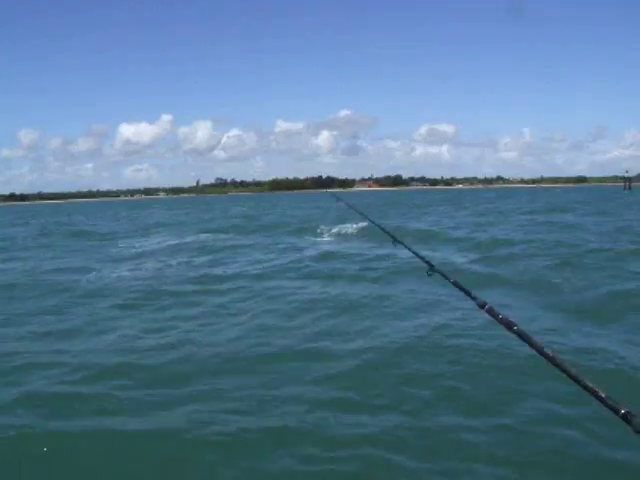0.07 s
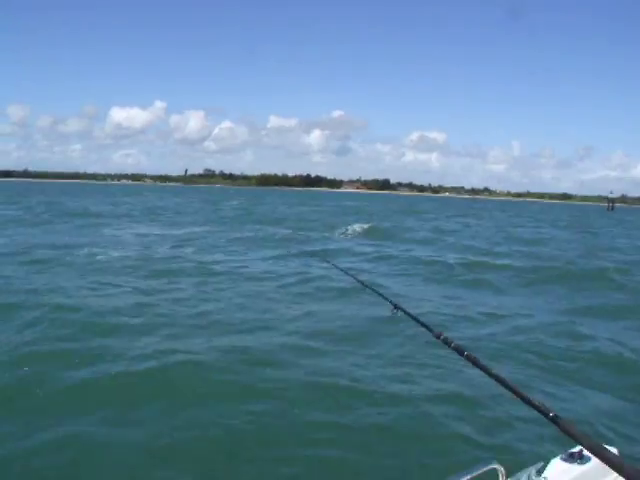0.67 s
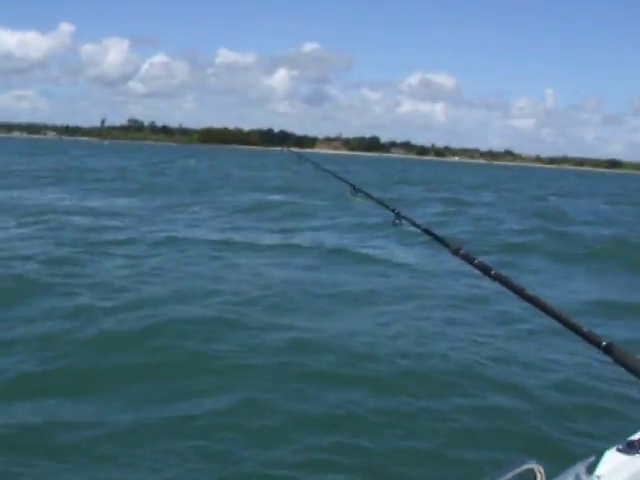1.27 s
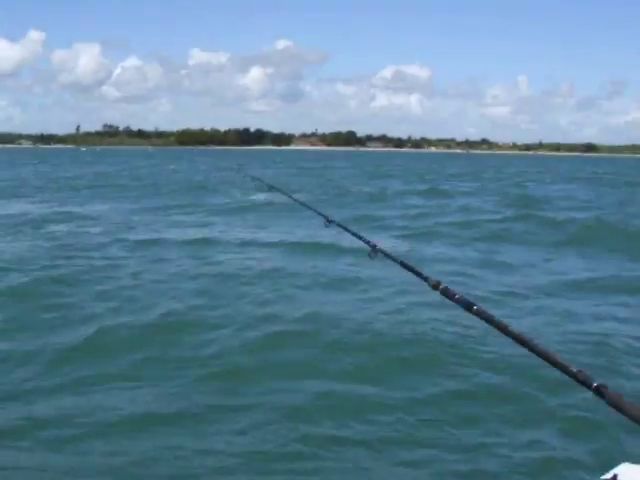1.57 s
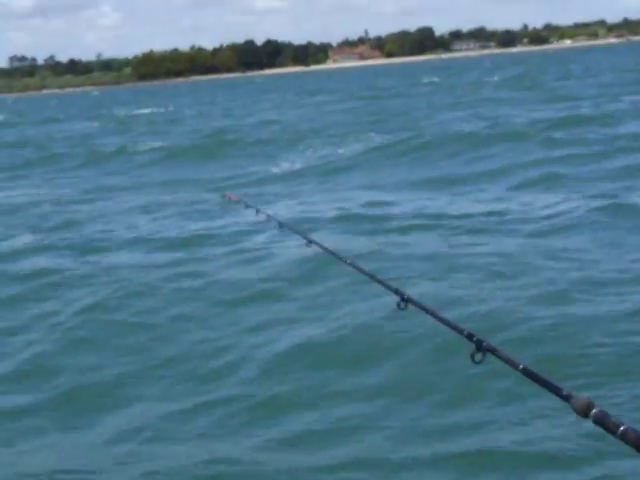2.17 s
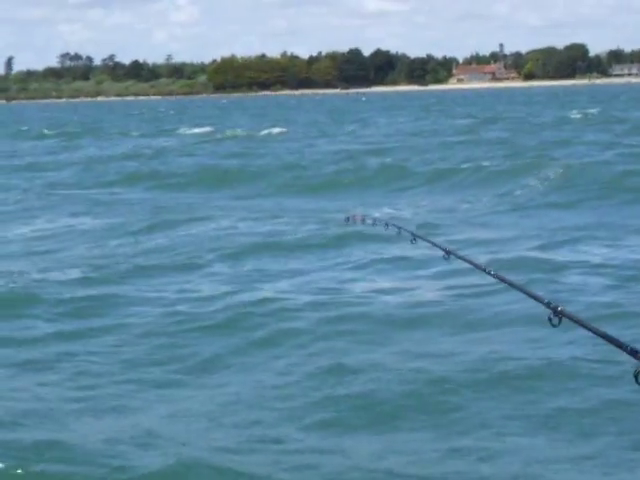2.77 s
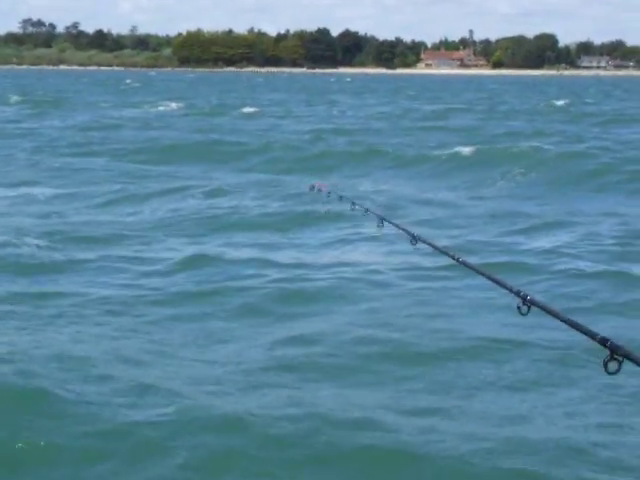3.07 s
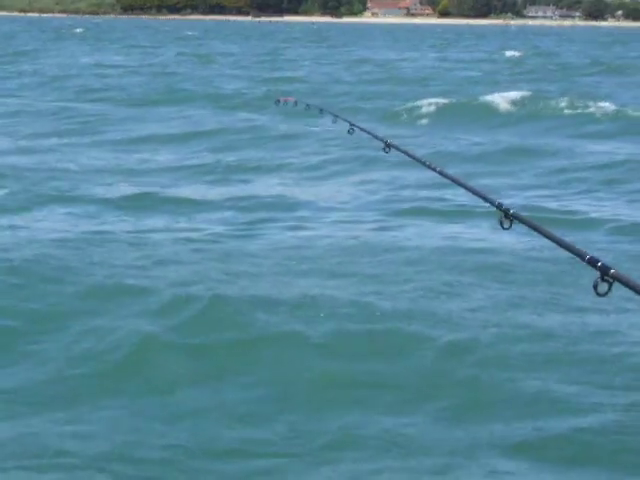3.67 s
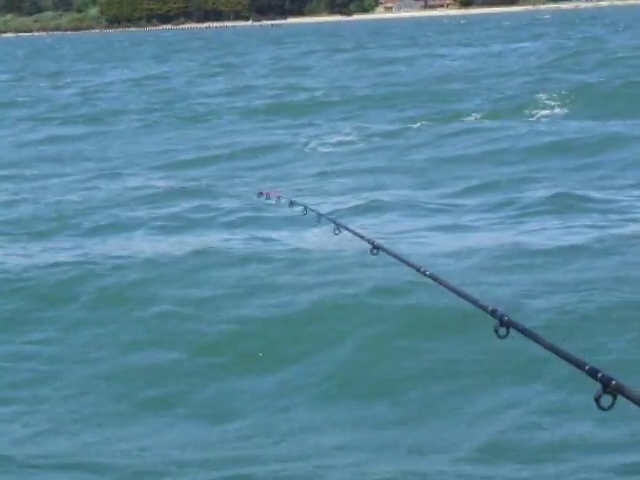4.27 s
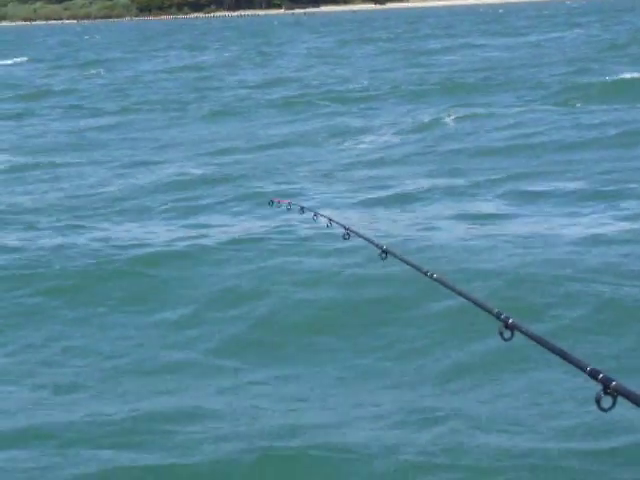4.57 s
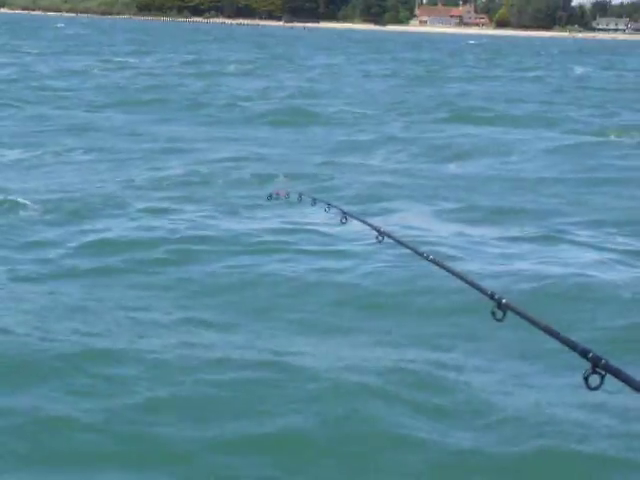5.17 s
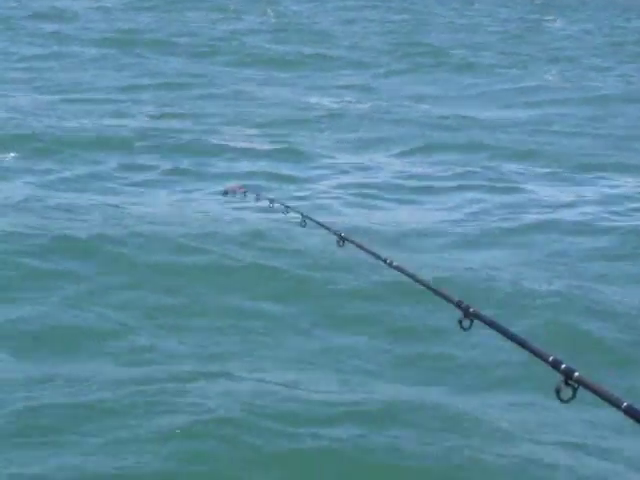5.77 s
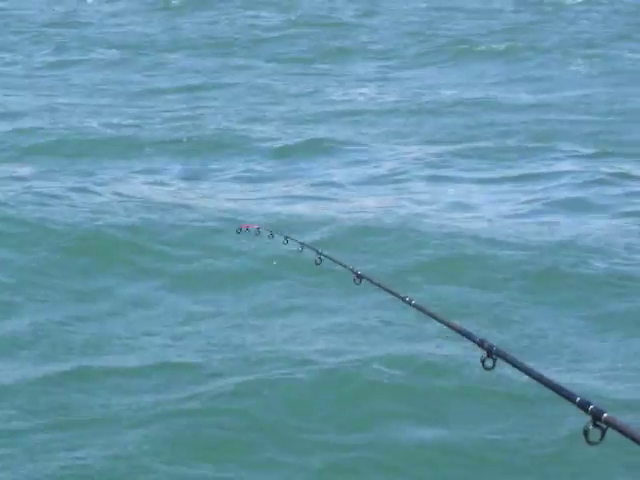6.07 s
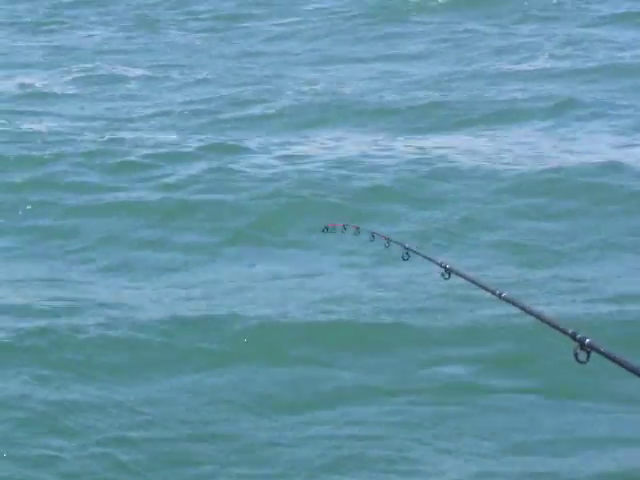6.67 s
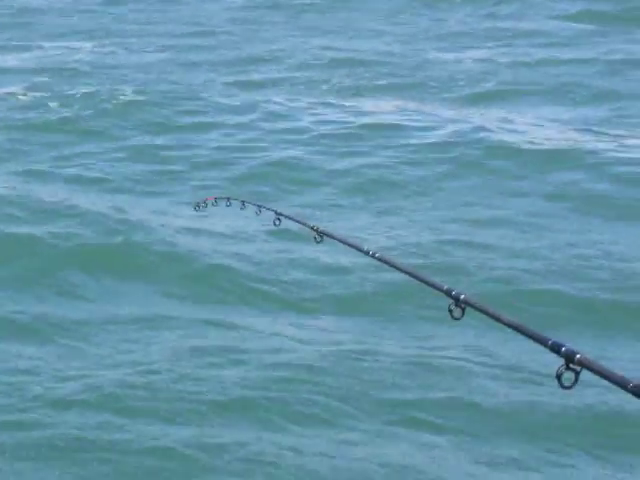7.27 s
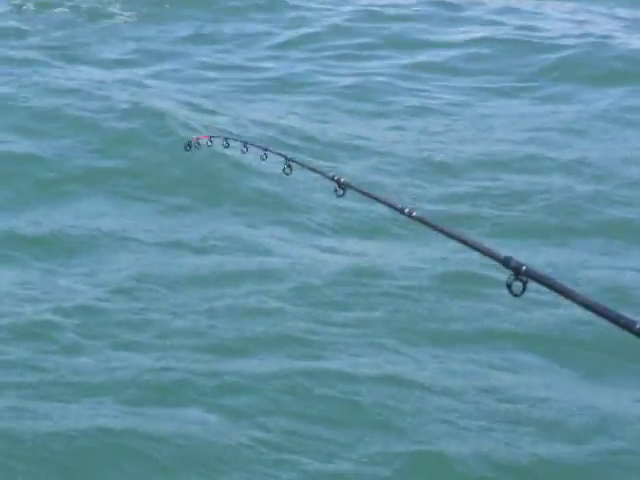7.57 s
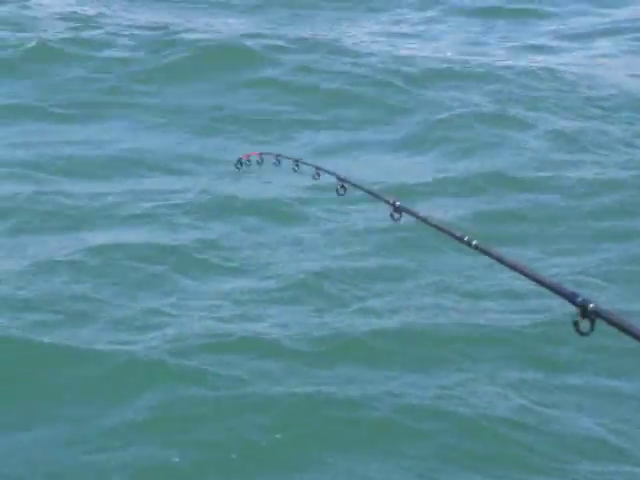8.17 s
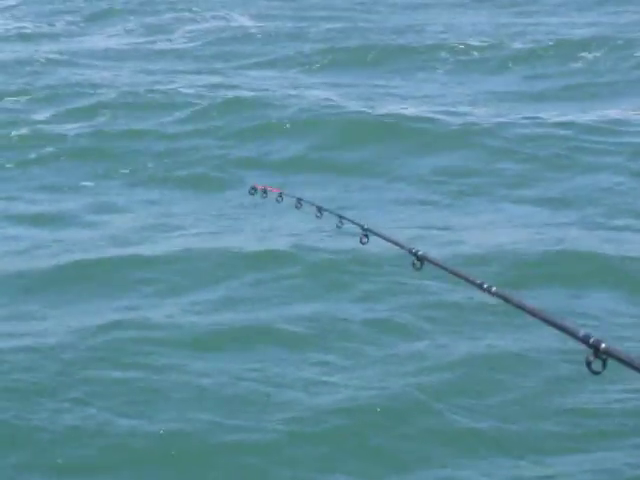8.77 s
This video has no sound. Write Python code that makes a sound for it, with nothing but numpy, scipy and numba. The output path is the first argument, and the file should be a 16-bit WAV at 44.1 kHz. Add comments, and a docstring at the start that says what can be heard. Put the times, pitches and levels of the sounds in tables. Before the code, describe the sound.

Stiff wind buffets the microphone with blunt pops and low rumble, over faintly hissing choppy water and a few plastic clicks.

```python
"""Stiff breeze on a small boat

Turbulent eddies strike a camera's microphone in short, blunt buffets and pops, each wrapped in a
low surge of pressure. Choppy water washes and hisses, bubbles plink, and the wind sings faintly in
the rail. Now and then a contact rings the plastic of the camera's case or the fishing tackle.
The camera's limiter ducks the whole sound, sea included, after each hard buffet."""
import sys
import numpy as np
from scipy import signal
from scipy.fft import rfft, irfft, next_fast_len
from scipy.io import wavfile
from scipy.ndimage import uniform_filter1d, map_coordinates
from numba import njit

SR = 44100
rng = np.random.default_rng(int(sys.argv[2]) if len(sys.argv) > 2 else 0)


def wav_out(sig):
    """Save sig, one row per channel (or a flat mono array), as 16-bit PCM at SR to the path in sys.argv[1]."""
    wavfile.write(sys.argv[1], SR, np.round(np.clip(np.atleast_2d(sig).T, -1, 1) * 32767).astype(np.int16))


N = 389403

# the eddies that stand out: centre_s, level_db, length_s, corner_hz
STRONG_EDDIES = [(0.859, -23, 0.066, 360), (1.021, -13, 0.017, 615), (1.048, -14, 0.021, 503),
                 (1.271, -12.5, 0.039, 900), (1.45, -16, 0.034, 418), (1.549, -20, 0.063, 514),
                 (1.626, -20.5, .037, 474), (1.714, -17.5, .01, 465), (1.773, -11.5, 0.031, 880),
                 (1.965, -14, 0.032, 580), (2.152, -18.5, 0.011, 272), (2.192, -20, 0.019, 380),
                 (2.259, -21.5, 0.012, 260), (2.379, -24, 0.036, 544), (2.598, -19.5, 0.019, 322),
                 (2.66, -12, 0.019, 434), (2.783, -15.5, 0.048, 850), (2.888, -18.5, 0.016, 487),
                 (2.974, -16.5, 0.051, 550), (3.143, -11, 0.023, 593), (3.178, -10, 0.032, 700),
                 (3.342, -17.5, 0.058, 540), (3.51, -16, 0.015, 505), (3.606, -19.5, 0.017, 424),
                 (3.693, -17, 0.017, 517), (3.808, -12, .021, 860), (3.874, -17, .01, 330),
                 (3.905, -15.5, .017, 467), (4, -20.5, 0.018, 343), (4.09, -16.5, 0.022, 300),
                 (4.15, -18, 0.014, 290), (4.237, -16, 0.022, 670), (4.316, -13.5, .026, 553),
                 (4.385, -24.5, 0.014, 350), (4.495, -18.5, 0.031, 680), (4.662, -11, 0.016, 705),
                 (4.91, -27, 0.035, 365), (5.093, -20, 0.06, 722), (5.246, -16, 0.023, 656),
                 (5.306, -20.5, 0.024, 660), (5.441, -16.5, 0.014, 313), (5.562, -21.5, .021, 302),
                 (5.66, -14.5, 0.0089, 790), (5.689, -17.5, 0.03, 796), (5.804, -15.5, 0.021, 680),
                 (6.26, -24, 0.011, 453), (6.515, -12.5, 0.019, 735), (6.616, -17, 0.021, 666),
                 (6.662, -17.5, 0.027, 510), (6.686, -17, 0.0097, 910), (6.847, -13, 0.01, 784),
                 (6.882, -17, 0.023, 474), (7.196, -12, 0.0089, 380), (7.418, -22, 0.014, 496),
                 (7.618, -14, 0.016, 445), (7.737, -20, 0.02, 590), (7.96, -14, 0.012, 476),
                 (8.121, -15.5, 0.014, 348), (8.246, -17, 0.035, 500), (8.27, -11, 0.012, 860),
                 (8.292, -18, 0.012, 500), (8.493, -14.5, 0.024, 580)]
# sudden pressure jumps at the microphone port: snap_s, peak_db, corner_hz
PRESSURE_JUMPS = [(0.108, -9, 550), (0.172, -21, 445), (.982, 1.5, 580), (1.247, -8.5, 596),
                  (1.7872, -1.5, 1400), (2.4526, -5, 980), (3.1331, -7, 890), (3.8069, -2, 1620),
                  (4.649, -6, 1210), (5.2489, -6.5, 2100), (5.6608, -5.5, 930), (5.79, -4.5, 744),
                  (6.5067, -0.5, 1310), (6.626, -2.5, 1350), (7.6117, -3.5, 760), (7.856, -5.5, 730),
                  (8.217, -4.5, 596), (8.733, -1, 486)]
# the steady breeze between the buffets: time_s, rumble_db
BREEZE_LEVELS = [(.05, -29.5), (.55, -40), (.78, -34.5), (1.0, -19.5), (1.7, -26), (2.05, -32),
                 (2.55, -31.5), (2.85, -18.5), (3.46, -28), (4.1, -16), (4.78, -32), (5.25, -15.5),
                 (5.7, -28.5), (5.92, -33), (6.7, -26), (7.3, -25), (7.9, -36), (8.3, -24.5), (8.6, -31)]


def amp(db):
    """Amplitude ratio of a level in decibels."""
    return 10 ** (np.asarray(db) / 20)


def unit(x):
    """Normalisation to an rms of 1."""
    return x / np.sqrt(np.mean(x ** 2) + 1e-20)


def curves(rows):
    """Linear interpolation: one value per sample for each column after the time."""
    times, *columns = np.transpose(rows)
    return [np.interp(np.arange(N) / SR, times, column) for column in columns]


def wobble(knots_per_s):
    """Smooth random modulation: a spline through Gaussian values."""
    knots = rng.standard_normal(int(N * knots_per_s / SR) + 4)
    return map_coordinates(knots, [np.arange(N) * knots_per_s / SR])


def filtered(x, response):
    """Linear filtering: the spectrum of x times a frequency response."""
    size = next_fast_len(len(x) + 8192)
    return irfft(rfft(x, size) * response(np.fft.rfftfreq(size, 1 / SR)), size)[:len(x)]


def colour(points):
    """Zero-phase response through (frequency_hz, level_db) points on a logarithmic axis."""
    point_hz, db = np.transpose(points)
    return lambda hz: amp(np.interp(np.log(hz + 1), np.log(point_hz + 1), db))


def resonances(modes):
    """Modal superposition: damped oscillators (pitch_hz, width_hz, level_db) of alternating sign."""
    return lambda f: sum((-1) ** k * amp(db) * 1j * f * width / (hz * hz - f * f + 1j * f * width)
                         for k, (hz, width, db) in enumerate(modes))


def noise(response):
    """White noise coloured by a response, at an rms of 1."""
    return unit(filtered(rng.standard_normal(N), response))


def patchy(x, depth_db):
    """Spectral modulation: small patches of time and frequency swell and fade."""
    spectra = signal.stft(x, nperseg=512)[2]
    field = uniform_filter1d(rng.standard_normal(spectra.shape), size=7, axis=0)
    field = unit(uniform_filter1d(field, size=12, axis=1))
    return unit(signal.istft(spectra * amp(depth_db * field), nperseg=512)[1][:N])


def add(track, start_s, sound):
    """Superposition of a sound on the track from start_s on."""
    i = int(np.clip(round(start_s * SR), 0, N - 1))
    track[i:i + len(sound)] += sound[:N - i]


@njit
def swept_lowpass(x, corner_hz):
    """A cascade of four one-pole low-passes, with a corner for each sample."""
    step = 1 - np.exp(-2 * np.pi * corner_hz / SR)
    y, state = np.empty_like(x), np.zeros(4)
    for i in range(len(x)):
        value = x[i]
        for k in range(4):
            state[k] += step[i] * (value - state[k])
            value = state[k]
        y[i] = value
    return y


def wind_pressure(surge_db=-14, db_per_doubling=2.2, rise_s=0.0094, fall_s=0.025, spread=0.38):
    """Envelope of the wind's push: the breeze and the strongest surge of the moment add in power."""
    # extra low thumps of wind pressure, alone or under a buffet or pop: peak_s, rumble_db, length_s
    thumps = [(.17, -30, .01), (.33, -23.5, .02), (4.08, -13.5, .03), (4.39, -12.5, 0.025),
              (4.9, -12.5, 0.014), (5.5, -14, 0.027), (6.16, -14, 0.04), (6.255, -11.5, 0.0064),
              (6.74, -19.5, 0.026), (7.04, -21.5, 0.032), (7.26, -18.5, 0.033), (8.07, -19.5, 0.0085),
              (8.745, -14.5, 0.0081)]
    # a pop stirs the air like a 10 ms buffet 14 dB below its peak
    strikes = [row[:3] for row in STRONG_EDDIES] + [(s, db - 14, .01) for s, db, _ in PRESSURE_JUMPS]
    # stronger and longer eddies push harder; one of -17 dB and 25 ms gives surge_db
    surges = [(s, surge_db + 0.57 * (db + 17) + db_per_doubling * np.log2(length_s / .025), length_s)
              for s, db, length_s in strikes]
    t = np.arange(N // 16) * 16 / SR
    push = np.zeros(len(t))
    for peak_s, db, length_s in surges + list(thumps):
        width_s = np.where(t < peak_s, rise_s, fall_s) + spread * length_s
        push = np.maximum(push, amp(db) * np.exp(-.5 * ((t - peak_s) / width_s) ** 2))
    return np.hypot(amp(curves(BREEZE_LEVELS)[0]), np.interp(np.arange(N) / SR, t, push))


def rumble(level_db=1.0, flutter_db=-21, lumps_db=6, heave_db=2.5):
    """Turbulent pressure: large slow eddies push the diaphragm, and small ones flutter on top."""
    # spectra of the large and of the small eddies: frequency_hz, density_db
    push_spectrum = [(8, -5.5), (18, 2), (30, 1.5), (55, -6.5), (95, -12), (160, -19.5), (300, -30),
                     (600, -56.5), (1500, -78.5)]
    flutter_spectrum = [(40, -16), (120, -3), (250, 0.5), (450, -10), (900, -28.5), (2000, -46.0)]
    push = noise(colour(push_spectrum))
    push /= np.sqrt(np.abs(uniform_filter1d(push ** 2, size=5000)) + .08)  # evens out chance swells
    push = unit(push * amp(heave_db * wobble(28)))
    flutter = unit(noise(colour(flutter_spectrum)) * amp(lumps_db * wobble(55)))
    return wind_pressure() * (amp(level_db) * push + amp(flutter_db) * flutter)


def sea_and_rail(wash_db=8.0, foam_db=3, tones_db=-1):
    """Broadband noise of waves and foam round the hull, with aeolian tones of the wind in the rail."""
    # the sea's wash and hiss as heard, held down through the gusty stretches: time_s, wash_db, foam_db
    heard_levels = [(0.05, -46.5, -45.5), (0.66, -44.5, -44.5), (1.1, -49, -48.5), (1.58, -44.5, -46.5),
                    (1.85, -48.5, -47.5), (2.36, -48.5, -49), (2.9, -54.5, -52), (3.73, -50, -50),
                    (4.24, -56.5, -51.5), (5.87, -56, -53), (6.26, -51.5, -48.5), (6.58, -55, -51.5),
                    (8.33, -55, -52.5), (8.8, -58, -53.5)]
    # spectrum of the washing water: frequency_hz, density_db
    wash_spectrum = [(40, -10), (100, -1), (200, 1.5), (380, -3), (550, 1.5), (1000, 0), (1600, -4),
                     (2700, -9), (4000, -14), (8000, -38)]
    # spectrum of the hissing foam: frequency_hz, density_db
    foam_spectrum = [(800, -20.5), (2000, -4), (3100, -3.5), (4000, -0.5), (4900, -2), (5600, -3),
                     (6400, -1), (7500, -5), (9000, -5)]
    # a bright band of fizz, relative to the foam column: time_s, level_db
    fizz_levels = [(.1, -6), (.45, -0.5), (1.3, -7), (2.1, -6), (2.6, 2), (3.1, -10.5), (4.8, -7),
                   (8.8, -7)]
    # a faint hum and the rail's narrow tones: pitch_hz, width_hz, level_db
    rail_tones = [(102, 8, -1), (519.6, 19, 6.5), (2585, 90, -24.5)]
    wash_level, foam_level = curves(heard_levels)
    wash = amp(wash_level + wash_db + wobble(18)) * patchy(noise(colour(wash_spectrum)), depth_db=1.34)
    foam_gain = amp(foam_level + foam_db + 0.88 * wobble(29))
    foam = foam_gain * patchy(noise(colour(foam_spectrum)), depth_db=1.6)
    fizz = amp(foam_level + curves(fizz_levels)[0]) * noise(resonances([(4890, 900, 0)]))
    singing = amp(foam_level + tones_db) * noise(resonances(rail_tones))
    return wash + foam + fizz + singing


def pops(build_cycles=1.08, leak_cycles=0.96):
    """Pressure relaxation: it builds one way, snaps to the other and leaks away through the port."""
    out, t = np.zeros(N), np.arange(-SR // 30, SR // 30) / SR
    signs = rng.choice([-1, 1], len(PRESSURE_JUMPS))
    for (snap_s, db, corner_hz), sign in zip(PRESSURE_JUMPS, signs):
        relax_s = np.where(t < 0, build_cycles, leak_cycles) / corner_hz  # blunter jumps last longer
        jump = np.sign(t) * np.exp(-np.abs(t) / relax_s)
        pop = swept_lowpass(jump, np.full(len(t), float(corner_hz)))
        steepest_s = np.diff(pop).argmax() / SR
        add(out, snap_s - steepest_s, sign * amp(db) * pop / np.abs(pop).max())
    return out


def ticks(level_db=1, rattle=0.33, rattle_t60_s=0.022, body_below_hz=3000):
    """Impact excitation: a sharp contact and a brief rattle ring the modes of the plastic."""
    # contacts of case and tackle, each with its own amount of low, hollow body: start_s, peak_db, body_db
    contacts = [(0.526, -8, -1), (.803, -19.5, -6), (0.8133, -13, 3.5), (0.84, -26, -14), (1.15, -22.5, -9),
                (1.1957, -25.5, -3), (1.235, -22.5, -13), (1.536, -28, -23), (1.713, -22, 1),
                (1.953, -22, -17), (2.263, -31, -18), (3.969, -29.5, -20), (4.1898, -33.5, -5),
                (4.868, -30, -1), (6.1715, -30.5, -8), (6.3732, -30, -1)]
    # resonances of the plastic: pitch_hz, width_hz, level_db
    plastic_modes = [(520, 140, -12), (1010, 690, -7), (1640, 730, -2.5), (2650, 440, -1),
                     (3760, 510, -5.5), (4620, 830, -8.5), (6130, 920, -5.5), (8100, 2250, -9.5)]
    out, t = np.zeros(N), np.arange(SR // 10) / SR
    for start_s, peak_db, body_db in contacts:
        force = rattle * rng.standard_normal(len(t)) * amp(-60 * t / rattle_t60_s)
        force[0] += 2  # the sharp first contact
        modes = [(hz, width, db + body_db * (hz < body_below_hz)) for hz, width, db in plastic_modes]
        ring = filtered(force, resonances(modes))
        add(out, start_s, amp(peak_db + level_db) * ring / np.abs(ring).max())
    return out


def bubbles(life_s=0.021, rise_per_life=.06):
    """Bubble resonance: trapped air pulsates as a damped oscillator and rises a little in pitch."""
    # bubbles beside the hull: start_s, peak_db, pitch_hz
    plinks = [(0.599, -33, 1950), (.675, -34, 1220), (2.07, -42, 2540), (2.491, -36, 1580)]
    out, t = np.zeros(N), np.arange(SR // 12) / SR
    envelope = t / life_s * np.exp(-5 * t / life_s)
    envelope /= envelope.max()
    for start_s, db, pitch_hz in plinks:
        phase = 2 * np.pi * pitch_hz * t * (1 + rise_per_life * t / (2 * life_s))
        add(out, start_s, amp(db) * envelope * np.sin(phase))
    return out


def small_eddies(per_s=5, offset_db=-4.5, scatter_db=1, length_s=.011, corner_hz=305):
    """Random arrivals of weak eddies whose level follows the breeze, as rows like STRONG_EDDIES."""
    when, weakness, size = rng.random((int(per_s * N / SR), 3)).T
    times = when * N / SR
    breeze_db = np.interp(times, *np.transpose(BREEZE_LEVELS))
    levels = breeze_db + offset_db + scatter_db * (1 - 2 * weakness)
    lengths = length_s * (.5 + size)
    return [(s, db, length, corner_hz) for s, db, length in zip(times, levels, lengths)]


def buffets(level_db=1.0, grit_db=2.5, crackle_db=1.56, brightening=0.56, edge=2.8, skirt=0.5):
    """Convected turbulence: an eddy passes abruptly; faster air has finer whirls and sounds brighter."""
    # spectrum of the turbulence inside an eddy: frequency_hz, density_db
    eddy_spectrum = [(15, -23.5), (40, 4), (100, 1.5), (200, 2), (500, -0.5), (1200, -3), (3000, -8),
                     (9000, -19)]
    out, t = np.zeros(N), np.arange(-SR // 8, SR // 8) / SR
    jolts = wobble(280)  # brief jolts inside an eddy are both louder and sharper
    turbulence = noise(colour(eddy_spectrum)) * amp(grit_db * jolts)
    above_rumble = signal.butter(2, 150, "highpass", fs=SR, output="sos")
    eddies = list(STRONG_EDDIES) + small_eddies()
    offsets = rng.integers(0, N - len(t), len(eddies))
    for (centre_s, db, length_s, corner_hz), i in zip(eddies, offsets):
        length_s = max(length_s, .006)
        span = slice(i, i + len(t))
        speed = (1 + np.abs(2 * t / length_s) ** (2 * edge)) ** -skirt * signal.windows.hann(len(t))
        sweep_hz = corner_hz * (0.17 + 0.79 * speed ** brightening) * amp(crackle_db * jolts[span])
        burst = speed ** 0.57 * swept_lowpass(turbulence[span], sweep_hz)
        # the level is that of the part above the rumble, over the eddy's length
        power = np.sum(signal.sosfilt(above_rumble, burst) ** 2) / (length_s * SR)
        add(out, centre_s + t[0], amp(db + level_db) * burst / np.sqrt(power))
    return out


def scene():
    """Superposition of wind, water and ticks at one microphone."""
    return (buffets() + pops() + rumble() + sea_and_rail() + bubbles() + ticks())[None]


@njit
def peak_follower(x, decay_per_sample):
    """Peak detection: follows every rise at once and falls back exponentially."""
    y = x.copy()
    for i in range(1, len(y)):
        y[i] = max(y[i], y[i - 1] * decay_per_sample)
    return y


def limiter(x, ceiling_db=-8.5, max_cut_db=7, attack_s=0.0081, release_s=0.068, deaf_below_hz=70):
    """Gain control: peaks over the ceiling, deep rumble aside, pull the gain down; it creeps back."""
    sensed = signal.sosfilt(signal.butter(1, deaf_below_hz, "highpass", fs=SR, output="sos"), x)
    over_db = np.clip(20 * np.log10(np.abs(sensed) + 1e-9) - ceiling_db, 0, max_cut_db)
    held_db = peak_follower(over_db, np.exp(-1 / (release_s * SR)))
    step = 1 - np.exp(-1 / (attack_s * SR))
    cut_db = signal.lfilter([step], [1, step - 1], held_db)
    return x * amp(-cut_db)


def record(dry, start_s=.036, top_hz=10400):
    """Limiting, saturation and band-limiting in the camera, which is silent until start_s."""
    # frequency response of the microphone: frequency_hz, gain_db
    microphone_response = [(20, 0), (7500, 0), (8300, -5), (9000, -13), (9700, -25), (10300, -38)]
    limited = limiter(dry[0]) * (np.arange(N) > start_s * SR)
    rounded = limited / (1 + (limited / .95) ** 8) ** (1 / 8)
    return filtered(rounded, lambda hz: colour(microphone_response)(hz) * (hz < top_hz))[None]


dry = scene()
out = record(dry)
wav_out(out)
```